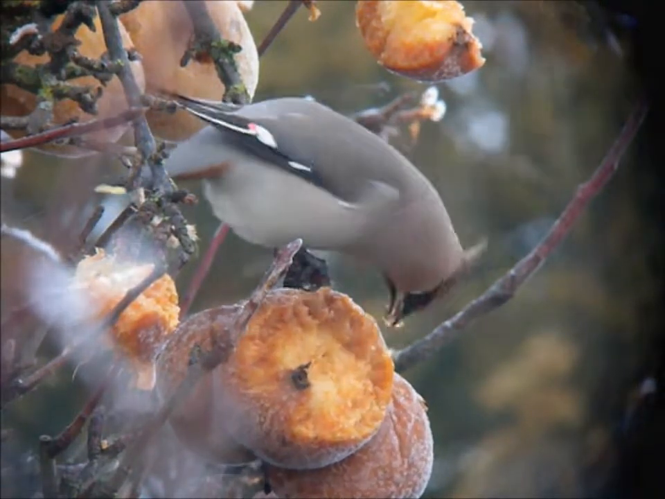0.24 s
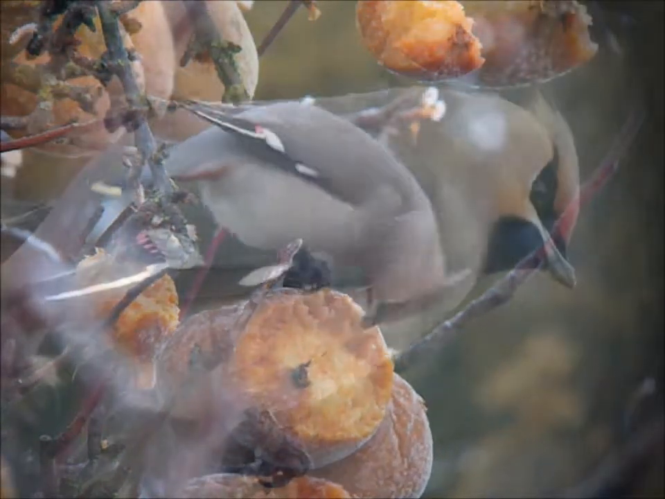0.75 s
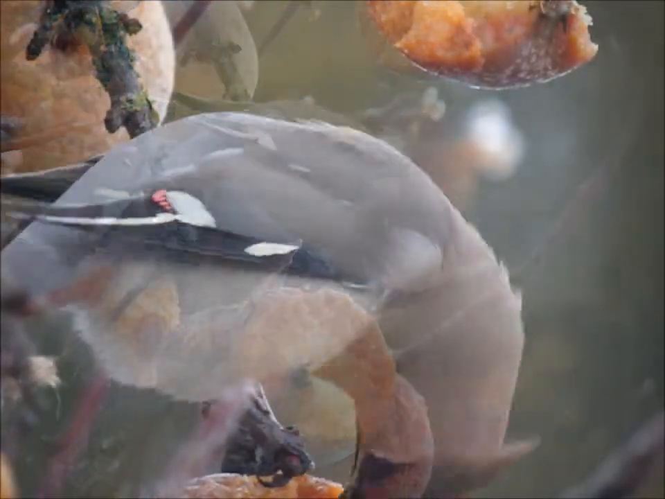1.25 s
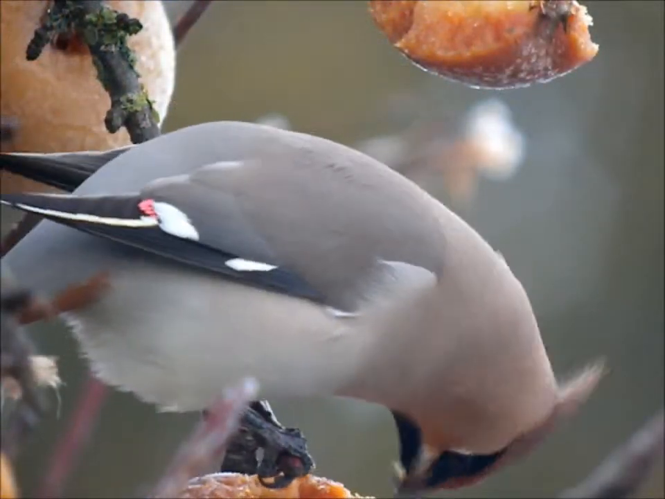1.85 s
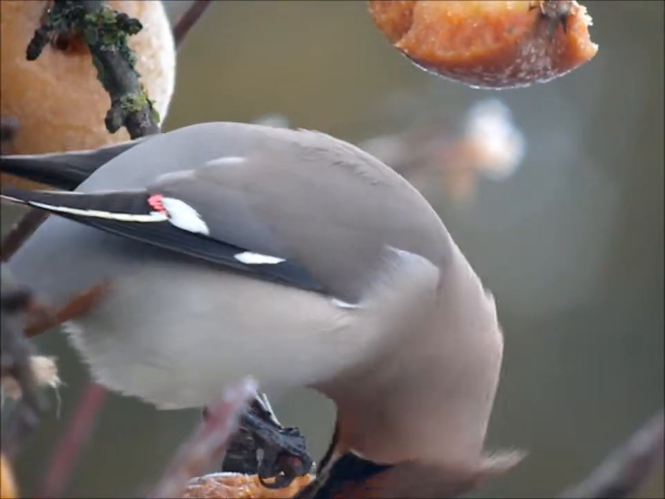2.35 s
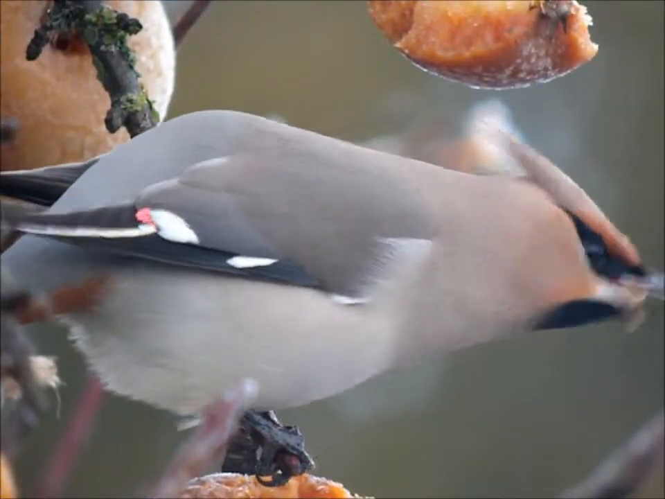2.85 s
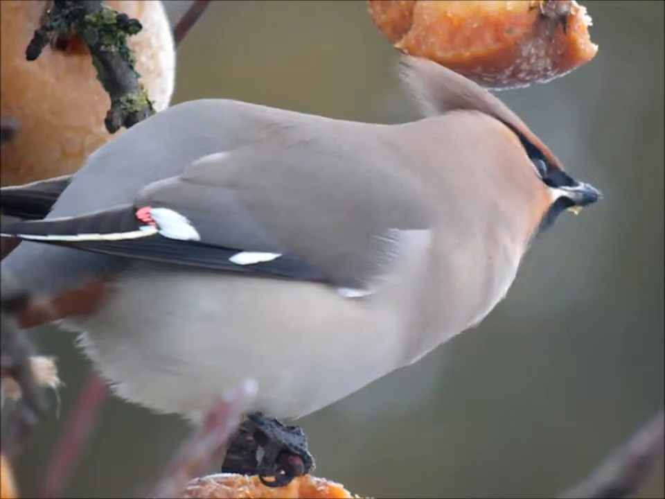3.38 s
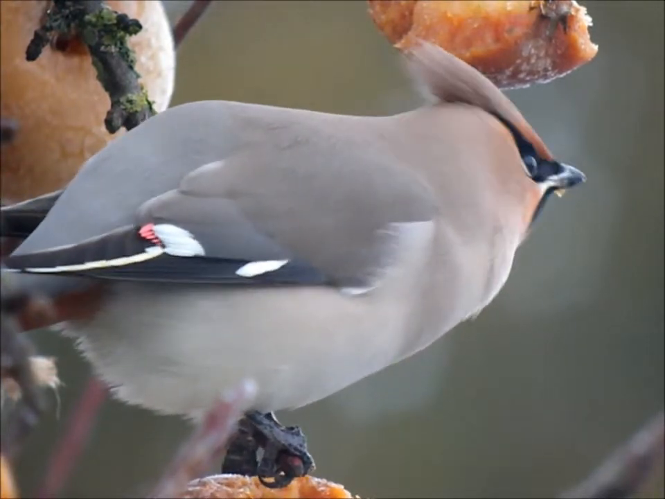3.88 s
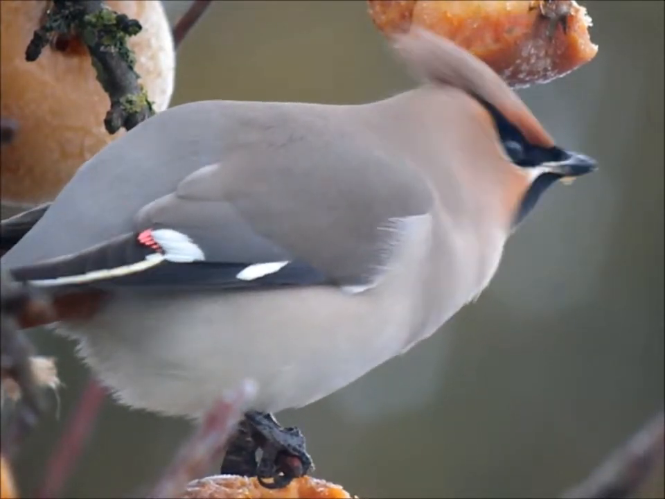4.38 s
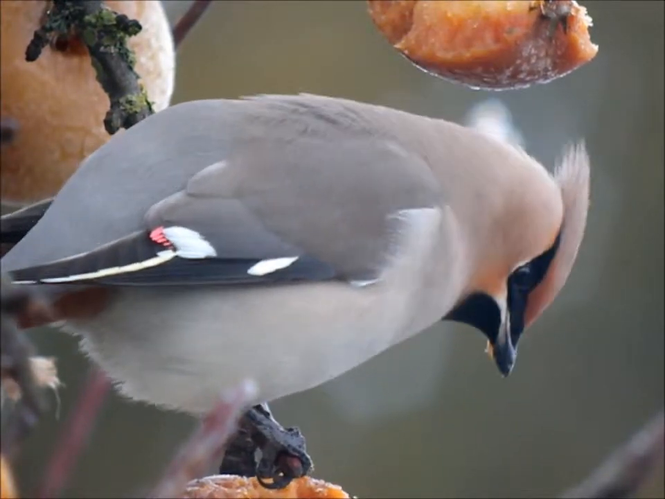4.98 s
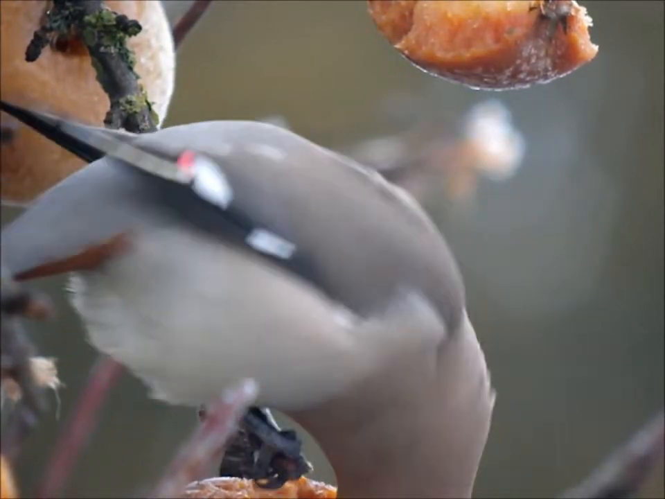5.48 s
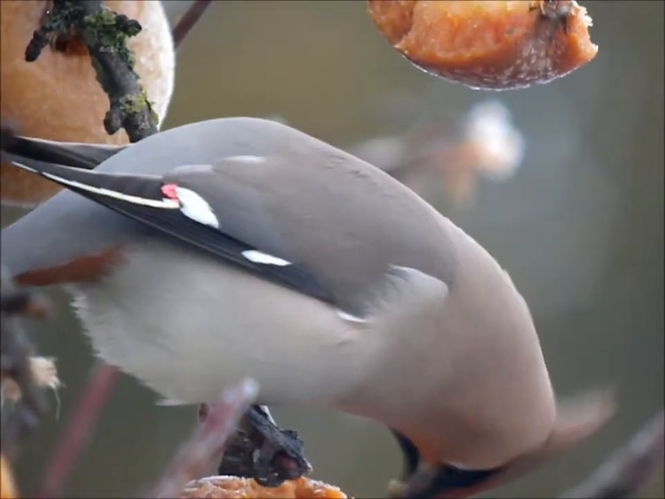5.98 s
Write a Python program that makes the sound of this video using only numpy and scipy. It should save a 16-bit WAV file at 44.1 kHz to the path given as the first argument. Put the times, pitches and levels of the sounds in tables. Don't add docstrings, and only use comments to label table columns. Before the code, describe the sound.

Outdoors by a fruit tree, distant sparrows peep and chatter for the first second over a quiet road wash. Then waxwings begin high, ringing trills of about twenty quick falling notes a second, overlapping, some bright and near, others faint and blurred by branches. Sparse sparrow warbles and tiny feather rustles fill in behind. The birds are nearly centred in a narrow stereo picture, and the road swells slightly near the end.

```python
import sys
import numpy as np
from scipy import signal
from scipy.fft import rfft, irfft
from scipy.io import wavfile
from scipy.ndimage import uniform_filter1d

SR = 44100
rng = np.random.default_rng(int(sys.argv[2]) if len(sys.argv) > 2 else 0)


def dump_mix(stems):
    frames = np.atleast_2d(stems).T
    limited = np.clip(frames, -1, 1)
    pcm = np.round(limited * 32767).astype(np.int16)
    wavfile.write(sys.argv[1], SR, pcm)


def makeup_ratio(level_db):
    decades = np.asarray(level_db, float) / 20
    return 10 ** decades


N = 274743

# (first knee [s], last knee [s], notes [count], gap after a flat lead-in note [s],
#  gap before a clipped last note [s])
TRILL_TIMES = [(1.1975, 1.605, 9, 0, .038), (1.778, 2.2575, 11, .047, 0), (2.1785, 2.6445, 11, .048, 0),
               (2.5825, 2.959, 9, 0, .0385), (3.405, 3.9215, 12, .05, .039), (3.3727, 3.9783, 14, 0, 0),
               (4.266, 4.7615, 11, .0305, 0), (4.2865, 4.677, 9, 0, 0), (4.7725, 5.1045, 8, .0475, .0355),
               (5.169, 5.3645, 5, 0, 0), (5.5285, 5.8685, 8, 0, .0265), (6.0425, 6.2275, 5, .0475, 0),
               (1.27, 1.748, 11, 0, 0)]
# (top [Hz], knee [Hz], first note lower by [Hz], last note lower by [Hz], lead-in [Hz])
TRILL_PITCHES = [(6390, 5610, 290, 300, 0), (6400, 5610, 320, 70, 5160), (6500, 5510, 480, 230, 5150),
                 (6340, 5570, 140, 200, 0), (6360, 5610, 30, 60, 5270), (6560, 5810, -290, 0, 0),
                 (6340, 5580, 0, 0, 5170), (6350, 5610, 340, 40, 0), (6310, 5540, 380, 180, 5600),
                 (6520, 5620, 370, 290, 0), (6240, 5520, 190, 0, 0), (6110, 5540, 120, 0, 5100),
                 (6500, 5810, 0, 0, 0)]
# (first note [dB], peak [dB], place of the peak [0-1], last note [dB])
TRILL_EFFORTS = [(-49, -38.5, .55, -48), (-35.5, -26.5, .4, -29.5), (-37, -25, .6, -28),
                 (-37.5, -37.5, .6, -42), (-49, -43.5, .5, -46), (-51, -44, .6, -54), (-47, -37, .55, -38),
                 (-43, -41, .2, -45), (-28, -26.5, .6, -29.5), (-46, -43.5, .35, -46.5),
                 (-47.5, -42, .8, -45), (-37.5, -23, .9, -23), (-53, -52, .3, -59)]
# (octave partial [dB], echo from trees [dB], foot of the drop [dB])
TRILL_VOICES = [(-33, -9, -3), (-23, -10, -5), (-20, -10, -18), (-29, -10, -6), (-27, -3, 1), (-27, 2, -16),
                (-27, -4, 0), (-28, -2, -8), (-25, -10, -15), (-29, -7, -8), (-26, -7, -7), (-26, -9, -9),
                (-30, 3, -16)]
# (time [s], length [s], start [Hz], end [Hz], level [dB])
SPARROW_PEEPS = [(0.0, .023, 4070, 4330, -42.5), (0.033, 0.042, 3590, 3200, -50.5),
                 (0.115, 0.066, 2450, 2610, -54), (.195, 0.036, 4270, 4080, -55),
                 (.227, 0.029, 3900, 2920, -52), (0.257, 0.057, 3990, 3790, -51.5),
                 (0.284, 0.052, 2530, 2700, -49.5), (0.361, 0.037, 2690, 2260, -57),
                 (.398, .053, 5030, 3330, -60), (0.461, .028, 3240, 2690, -55),
                 (0.729, 0.032, 4600, 3530, -51), (0.763, 0.031, 3376, 3320, -49.5),
                 (0.985, 0.049, 4180, 4580, -52), (1.298, 0.037, 4600, 3530, -48.5),
                 (1.354, .038, 2160, 2480, -56), (1.771, 0.031, 3750, 3710, -44),
                 (3.174, 0.034, 5590, 3450, -57), (3.238, .035, 3330, 4000, -60),
                 (3.268, .017, 3980, 2880, -59), (3.604, 0.06, 3790, 3150, -58),
                 (4.15, 0.045, 4200, 3700, -60), (5.313, 0.039, 4490, 3800, -54),
                 (5.372, 0.043, 3120, 2950, -45.5), (5.541, 0.082, 3100, 2850, -55.5)]
# (time [s], length [s], start [Hz], end [Hz], level [dB])
THIN_SEEPS = [(0.03, 0.031, 4670, 4650, -57), (0.143, .052, 5850, 5680, -60.5),
              (0.676, 0.032, 4900, 5960, -61), (0.987, 0.046, 5150, 5400, -52),
              (0.995, .053, 5950, 5880, -57), (1.074, .025, 5000, 5700, -56),
              (1.132, 0.02, 5160, 5000, -53), (3.155, 0.021, 5600, 5480, -59),
              (3.323, .051, 6350, 6680, -54.5), (3.407, .032, 6960, 6470, -54),
              (4.32, 0.087, 6460, 7300, -55), (4.38, 0.045, 7300, 6750, -57),
              (5.366, 0.045, 5990, 6100, -41), (5.4, 0.021, 5500, 5980, -49),
              (5.417, 0.086, 5640, 5940, -53), (5.453, 0.053, 5130, 4700, -49)]
# (last crest [s], crest [Hz], trough [Hz], level [dB])
CLOSING_WARBLES = [
    (1.169, 3950, 2950, -47.5),
    (1.905, 3850, 2945, -48),
    (2.899, 3950, 2925, -54),
    (3.91, 4150, 2865, -46.5),
    (5.06, 3800, 3050, -47.5),
    (5.93, 3750, 2850, -43),
]
# (time [s], length [s], start [Hz], end [Hz], swing [Hz], level [dB])
SPARROW_CHATTER = [
    (0, 0.14, 4260, 3620, 800, -53),
    (0.189, 0.14, 4450, 3556, 895, -58.5),
    (0.692, 0.061, 4380, 3870, 500, -59.5),
    (0.998, 0.15, 4365, 3330, 600, -49),
    (1.754, 0.11, 3860, 3320, 510, -51.5),
    (2.748, 0.17, 4440, 3487, 870, -49.5),
    (3.741, .13, 4010, 3410, 794, -48),
    (4.88, .19, 4404, 3700, 790, -52),
    (5.316, 0.11, 4100, 3416, 730, -53.5),
    (5.767, 0.14, 3910, 3370, 510, -45),
]
# (time [s], length [s], centre [Hz], width [Hz], level [dB])
WING_RUSTLES = [
    (0.237, 0.062, 7160, 7000, -52.5),
    (0.998, 0.076, 8350, 3000, -58),
    (1.573, .09, 8400, 4000, -56),
    (3.046, .07, 6000, 9000, -57),
    (4.37, 0.102, 7100, 700, -53),
    (5.373, 0.083, 7350, 4000, -58),
    (5.797, 0.08, 7950, 5000, -58),
]
# (frequency [Hz], level per Hz [dB])
TRAFFIC_COLOUR = [
    (15, -53),
    (25, -34.5),
    (217, -11.5),
    (607, -4),
    (1440, -5.5),
    (3200, -9),
    (6200, -16),
    (15000, -19.5),
]
# (time [s], level [dB])
TRAFFIC_SWELL = [
    (0.0, -52),
    (5.46, -49.5),
    (6.23, -48),
]
# (time [s], half length [s], pitch [Hz], level [dB])
ENGINE_TONES = [
    (1.95, .1, 128, -61),
    (2.55, .16, 213, -63),
    (4.8, .2, 213, -65),
]
# (low [Hz], high [Hz], how far below the trill [dB])
HIDDEN_BANDS = [
    (6720, 7580, 24),
    (7580, 8270, 41),
]


def waxwings():
    out = np.zeros(N)
    breath_s = .0115
    clipped_db = -25
    trills = zip(TRILL_TIMES, TRILL_PITCHES, TRILL_EFFORTS, TRILL_VOICES)
    for timing, pitch, effort, (octave_db, echo_db, foot_db) in trills:
        notes = phrase(timing, pitch, effort)
        knees = notes[0]
        gaps = np.diff(knees, prepend=knees[0] - .04)
        lengths = np.clip(gaps - breath_s, .026, .04)
        feet_db = foot_db + clipped_db * (knees > timing[1] + .01)
        start = knees[0] - .06
        bird = np.zeros(SR + SR // 2)
        for (knee, top_hz, knee_hz, db), length, fall_db in zip(notes.T, lengths, feet_db):
            syllable = note(length, top_hz, knee_hz, db, octave_db, fall_db)
            add(bird, syllable, knee - length - start)
        twigs, trees = scatter(.04, .03), scatter(.3, .4)
        perched = bird + makeup_ratio(-5) * convolve(bird, twigs)
        perched *= makeup_ratio(0.19) * np.std(bird) / np.std(perched)
        add(out, perched + makeup_ratio(echo_db) * convolve(bird, trees), start)
    return out


def phrase(timing, pitch, effort):
    first, last, count, lead, close = timing
    top_hz, knee_hz, rise_hz, sag_hz, lead_hz = pitch
    first_db, peak_db, place, last_db = effort
    jitter_s, settle_notes, knee_share = .0007, 1.1, .3
    lead_db, lead_rise = -3, .03
    knees = np.linspace(first, last, count) + jitter_s * rng.standard_normal(20)[:count]
    if close:
        knees = np.append(knees, last + close)
    k = np.arange(len(knees))
    lower = rise_hz * np.exp(-k / settle_notes) + sag_hz * (k / k[-1]) ** 2
    rows = np.array([knees, top_hz - lower, knee_hz - knee_share * lower])
    if lead:
        lead_note = (first - lead, lead_hz * (1 - lead_rise), lead_hz)
        rows = np.insert(rows, 0, lead_note, axis=1)
    place = np.clip(place, .05, .95)
    u = np.linspace(0, 1, rows.shape[1])
    leaning_in = (first_db - peak_db) * (1 - u / place) ** 2
    easing_off = (last_db - peak_db) * ((u - place) / (1 - place)) ** 2
    db = peak_db + np.where(u < place, leaning_in, easing_off)
    if lead:
        db[0] += lead_db
    return np.vstack([rows, db])


def note(length, top_hz, knee_hz, db, octave_db, foot_db):
    rise, drop, fall_hz, bend = .007, .006, 2550, 1.7
    u = np.arange(int(.055 * SR)) / SR
    leap = top_hz * (1 - .26 * np.clip(1 - u / rise, 0, 1) ** 2.5)
    down = np.clip((u - rise) / (length - rise), 0, 1)
    slide = (top_hz - knee_hz) * (1 - (1 - down) ** bend)
    fall = fall_hz * np.clip((u - length) / drop, 0, 1)
    hz = leap - slide - fall
    phase = 2 * np.pi * np.cumsum(hz * (1 + .003 * wobble(len(u), 400))) / SR
    shape_db = curve([(0, -30), (.0012, -7), (rise, -1.5), (.65 * length, 0), (length, -1),
                      (length + .85 * drop, foot_db), (length + drop, -40)], u)
    octave = makeup_ratio(octave_db + 3 * wobble(len(u), 500)) * np.sin(2 * phase)
    voice = np.sin(phase) + octave * np.clip(hz / 2000 - 1.45, 0, 1)
    voice *= 1 + .075 * wobble(len(u), 2200)
    level = makeup_ratio(db + shape_db + 1.8 * wobble(len(u), 250))
    return np.sqrt(2) * level * voice * (u < length + drop)


def sparrows():
    arcs, chatter = np.zeros(N), np.zeros(N)
    for s, length, start_hz, end_hz, db in SPARROW_PEEPS + THIN_SEEPS:
        u = np.linspace(1, 0, int(length * SR))
        hz = end_hz + (start_hz - end_hz) * u ** 1.4
        add(arcs, whistle(hz, db, rough_db=4.5, waver=0.016), s)

    turn_s, before_s, after_s = .042, .078, .026
    for crest, crest_hz, trough_hz, db in CLOSING_WARBLES:
        u = np.arange(-before_s, after_s, 1 / SR)
        hz = crest_hz - (crest_hz - trough_hz) * np.abs(np.sin(np.pi * u / turn_s)) ** 1.2
        add(arcs, whistle(hz, db, rough_db=1.0, waver=0.015), crest - before_s)
        undertone_hz = np.full(int(0.043 * SR), 3030.0)
        add(arcs, whistle(undertone_hz, db - 3.5, rough_db=-1.0, waver=0.01), crest - .11)

    for s, length, start_hz, end_hz, swing_hz, db in SPARROW_CHATTER:
        u = np.linspace(0, 1, int(length * SR))
        turns = np.cumsum(90 - 50 * u) / SR
        warble = np.sin(2 * np.pi * turns + 1.5 * wobble(9000, 50)[:len(u)])
        hz = start_hz + (end_hz - start_hz) * u ** 0.73 + swing_hz * warble
        add(chatter, whistle(hz, db, rough_db=6.0, waver=0.0242), s)
    echoes = convolve(makeup_ratio(-5.5) * arcs + .8 * chatter, scatter(.22, .3))
    return arcs + .85 * chatter + echoes


def whistle(hz, db, rough_db, waver):
    noise_db = rough_db * wobble(9000, 680)
    drift = waver * wobble(9000, 239)
    u = np.linspace(0, 1, len(hz))
    phase = 2 * np.pi * np.cumsum(hz * (1 + drift[:len(u)])) / SR
    swell = np.sin(np.pi * u) ** .4
    return np.sqrt(2) * makeup_ratio(db + noise_db[:len(u)]) * swell * np.sin(phase)


def rustles(t, hz):
    out = np.zeros(N)
    for s, length, centre_hz, width_hz, db in WING_RUSTLES:
        stroke = np.exp(-((t - s) / length * 2) ** 2)
        hiss = shaped(np.exp(-((hz - centre_hz) / width_hz) ** 2))
        out += makeup_ratio(db) * stroke * hiss
    return out


def traffic(t, hz):
    point_hz, point_db = np.transpose(TRAFFIC_COLOUR)
    colour = makeup_ratio(np.interp(np.log(hz + 1), np.log(point_hz), point_db))
    low = 1 / (1 + (hz / 2300) ** 4)
    low_colour, high_colour = colour * low, colour * (1 - low)
    share = np.sqrt(np.sum(high_colour ** 2) / np.sum(low_colour ** 2))
    wash = makeup_ratio(curve(TRAFFIC_SWELL, t) + 0.57) * shaped(low_colour)
    air = makeup_ratio(-55.0) * share * shaped(high_colour)
    return wash + air


def drone(t):
    out = np.zeros(N)
    for s, half, hz, db in ENGINE_TONES:
        out += makeup_ratio(db) * np.exp(-((t - s) / half) ** 2) * np.sin(2 * np.pi * hz * t)
    return out


def curve(points, u):
    return np.interp(u, *np.transpose(points))


def scatter(t60, length):
    u = np.arange(int(length * SR)) / SR
    h = rng.standard_normal(len(u)) * makeup_ratio(-60 * u / t60)
    return h / np.sqrt(np.sum(h ** 2))


def convolve(x, h):
    return signal.fftconvolve(x, h)[:len(x)]


def wobble(size, rate):
    k = max(int(SR / rate), 2)
    w = uniform_filter1d(uniform_filter1d(rng.standard_normal(size), k), k)
    return w * np.sqrt(1.452 * k)


def shaped(gain):
    x = irfft(rfft(rng.standard_normal(N)) * gain, N)
    return x / np.std(x)


def add(track, x, s):
    i = int(s * SR)
    x = x[:max(len(track) - i, 0)]
    track[i:i + len(x)] += x


def scene():
    t, hz = np.arange(N) / SR, np.fft.rfftfreq(N, 1 / SR)
    birds = waxwings() + sparrows()
    walls = makeup_ratio(-22) * convolve(birds, scatter(.6, .7))
    mid = birds + walls + rustles(t, hz) + traffic(t, hz) + drone(t)
    spread_birds = makeup_ratio(-1.5) * convolve(birds, scatter(.08, .1))
    side = makeup_ratio(-20.3) * (spread_birds + traffic(t, hz))
    return np.array([mid + side, mid - side])


def top_cut(x):
    return signal.sosfilt(signal.butter(12, 16350, fs=SR, output="sos"), x)


def record(dry):
    hz, _, frames = signal.stft(dry, SR, nperseg=2048)
    power = np.abs(frames.sum(axis=0)) ** 2
    trill = power[(hz > 4700) & (hz < 6890)].sum(axis=0)
    for low_hz, high_hz, margin_db in HIDDEN_BANDS:
        band = (hz >= low_hz) & (hz < high_hz)
        heard = power[band].sum(axis=0) * makeup_ratio(2 * margin_db) > trill
        frames[:, band] *= heard
    frames[:, hz > 15800] = 0
    mix = signal.istft(frames, SR, nperseg=2048)[1][:, :N]
    return top_cut(mix)


dry = scene()
out = record(dry)
dump_mix(out)
```